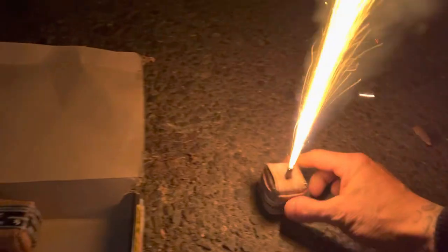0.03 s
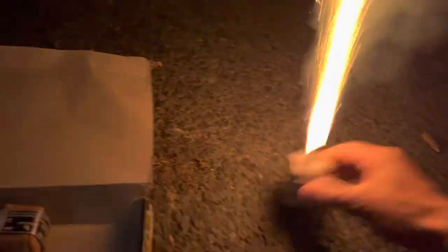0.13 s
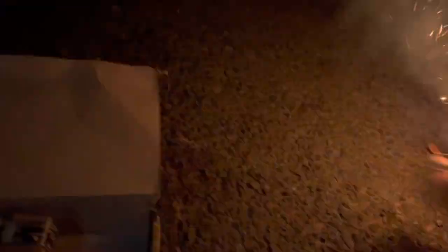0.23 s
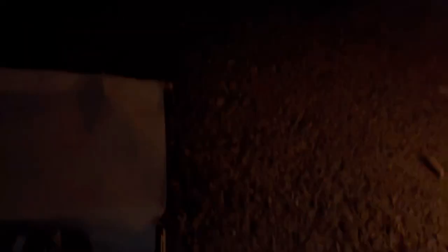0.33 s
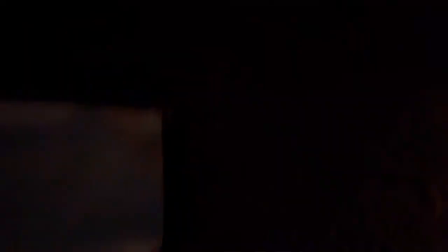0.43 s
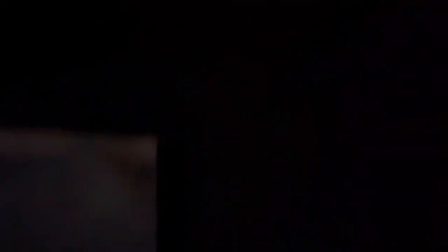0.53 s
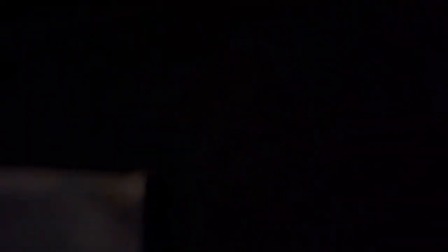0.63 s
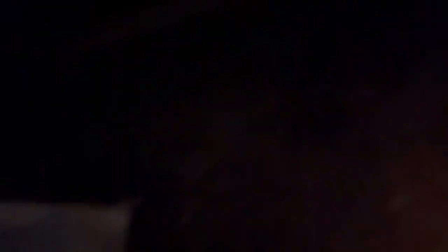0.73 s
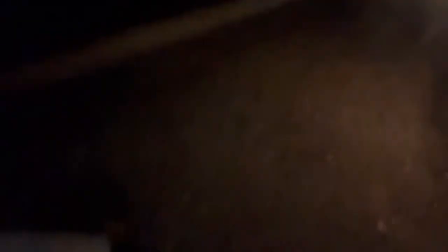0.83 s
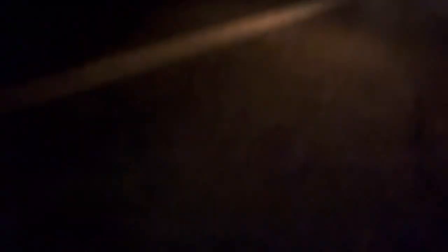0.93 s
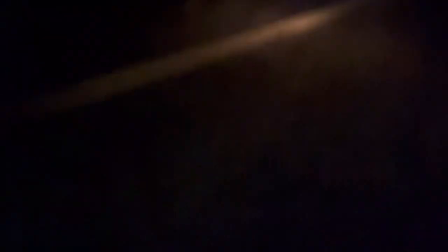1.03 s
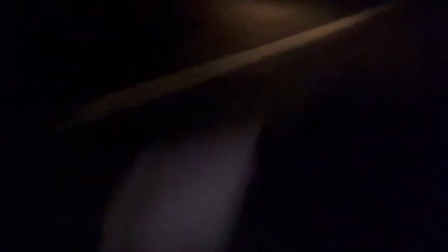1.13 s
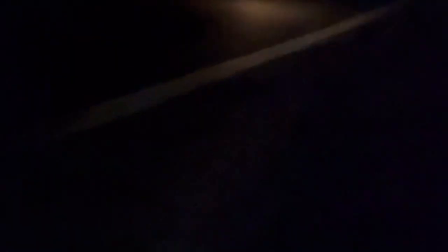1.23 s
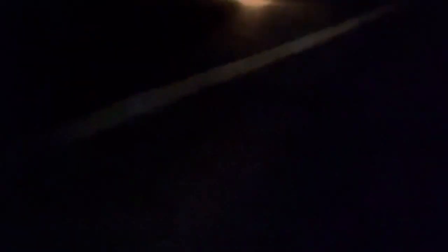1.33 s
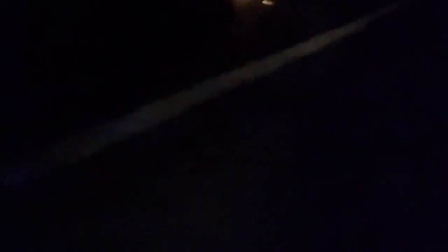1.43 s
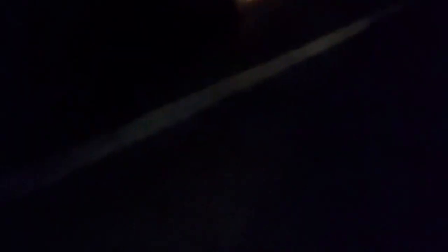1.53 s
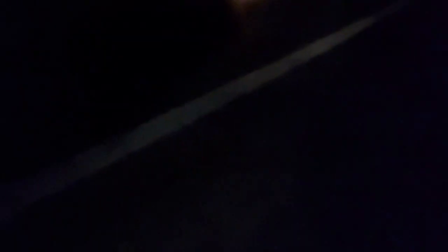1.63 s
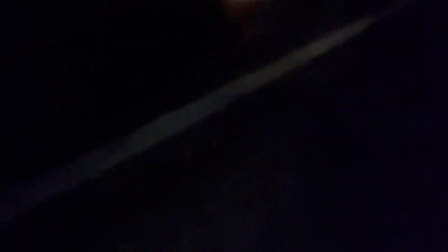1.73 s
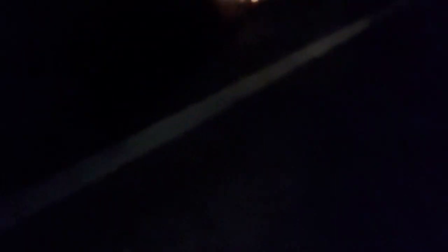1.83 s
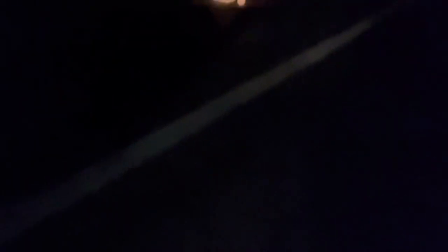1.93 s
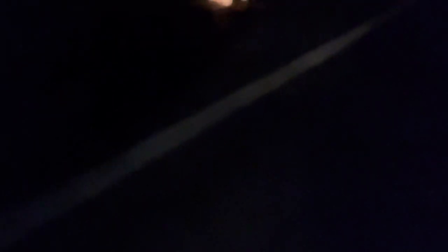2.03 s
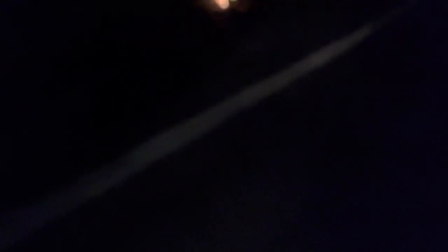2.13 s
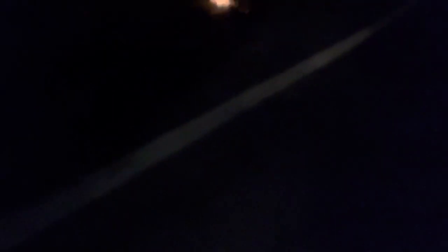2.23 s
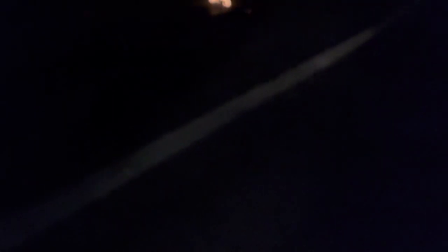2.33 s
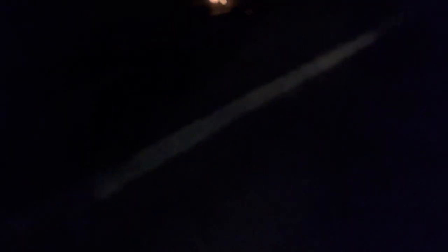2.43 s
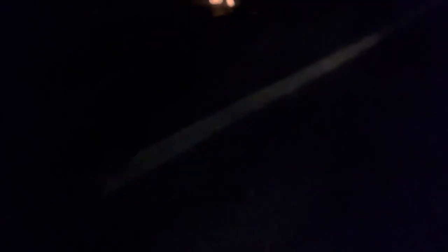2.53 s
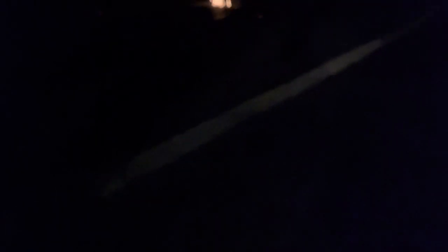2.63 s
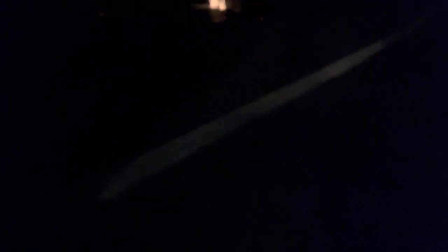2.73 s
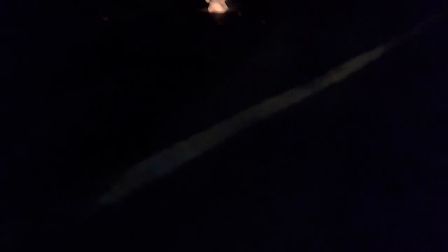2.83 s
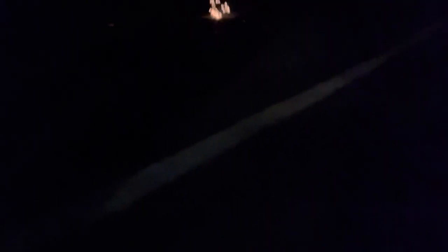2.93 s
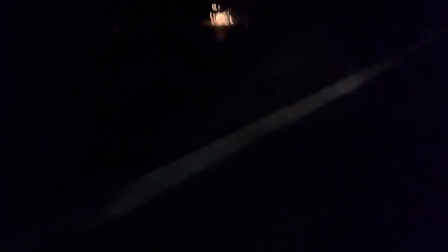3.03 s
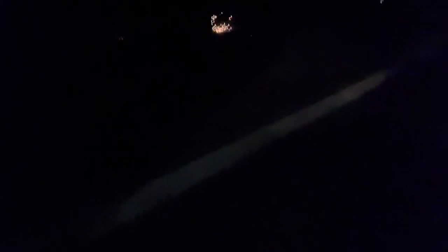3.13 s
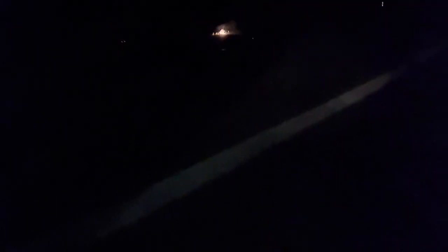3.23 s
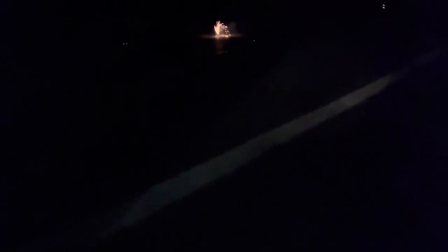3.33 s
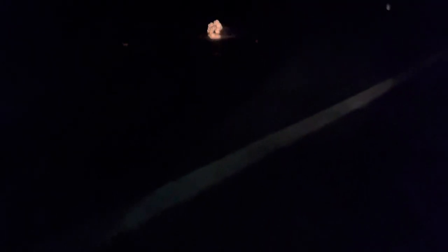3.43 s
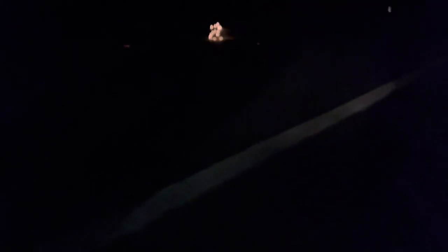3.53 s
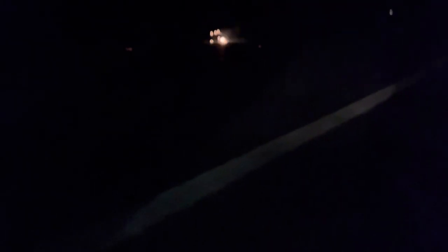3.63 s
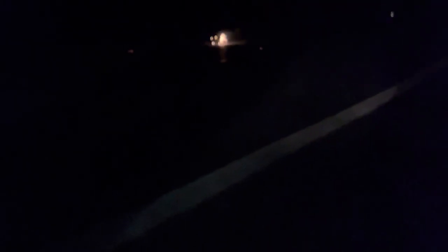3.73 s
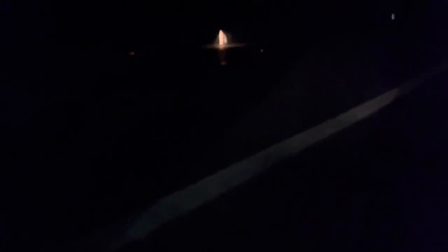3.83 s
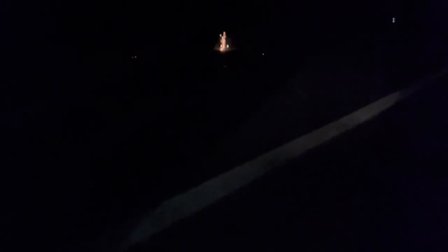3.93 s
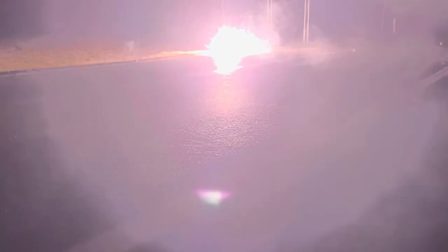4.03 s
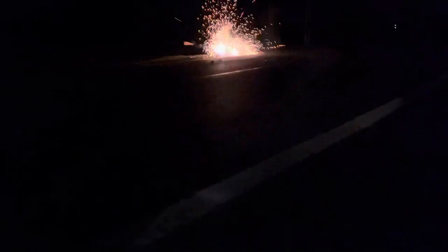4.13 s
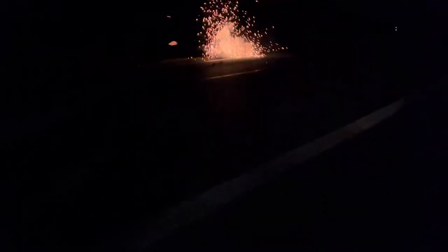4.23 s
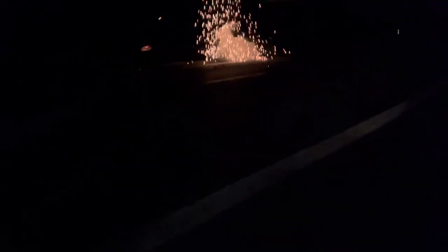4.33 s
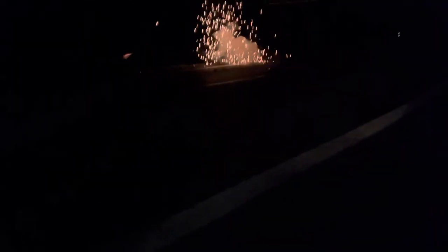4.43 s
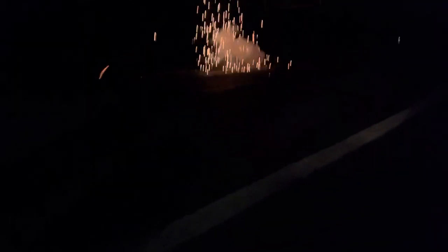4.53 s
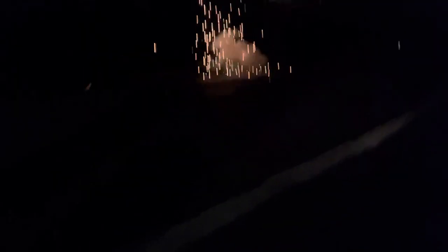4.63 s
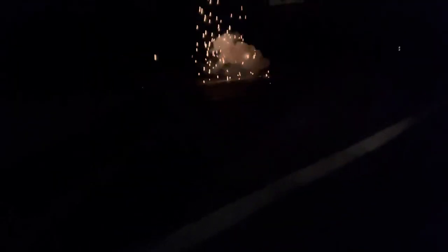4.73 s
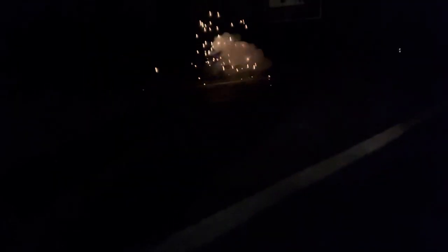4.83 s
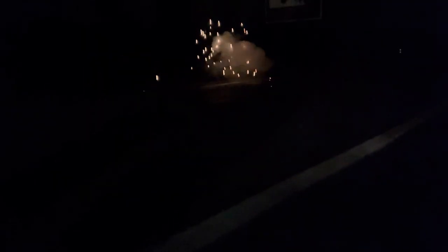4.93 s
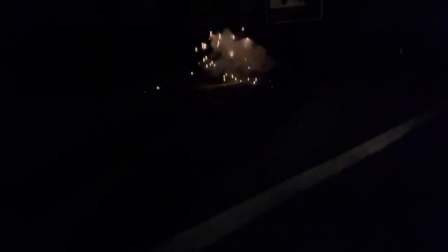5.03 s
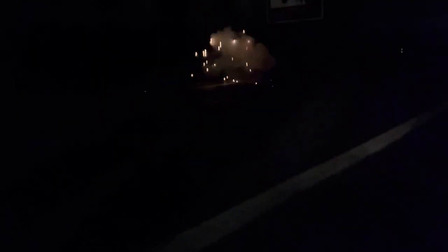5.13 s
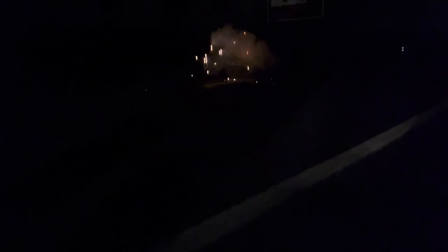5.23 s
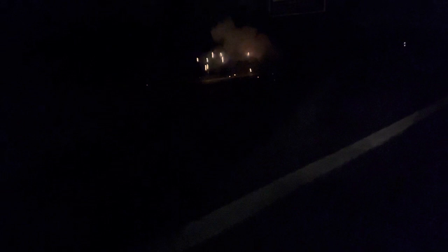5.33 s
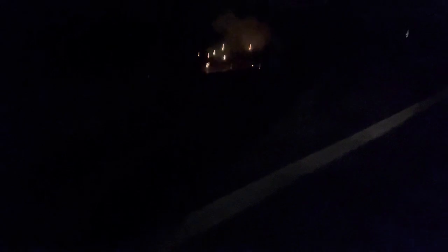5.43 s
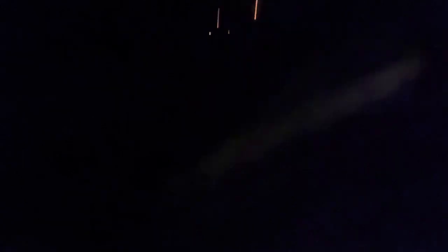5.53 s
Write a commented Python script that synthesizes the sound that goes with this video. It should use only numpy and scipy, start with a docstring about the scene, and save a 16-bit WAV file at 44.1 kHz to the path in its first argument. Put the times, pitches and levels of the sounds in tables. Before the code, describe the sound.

Fierce fizzing jet nearby, tossed onto asphalt with hard clacks, thin distant hiss, then a sharp clipped firecracker explosion with dull fading echoes.

```python
"""Firecracker on a night road

A firecracker with a burning fuse is lifted close by, thrown down the road and bounces to rest, hissing.
The jet, coloured noise, reaches the microphone directly and off asphalt and arm; each knock rings the case.
The bang, chirped pressure fronts, overloads the microphone and rolls back, ever duller, as fading noise from
far walls and trees, with thumps and a low boom. Embers tick, a sleeve swishes, far traffic lies beneath."""
import sys
import numpy as np
from scipy import signal
from scipy.fft import rfft, irfft, next_fast_len
from scipy.io import wavfile
from scipy.ndimage import uniform_filter1d, map_coordinates

SR = 44100
rng = np.random.default_rng(int(sys.argv[2]) if len(sys.argv) > 2 else 0)


def persist_wave(psi):
    """Save psi, clipped to +-1, as 16-bit WAV."""
    counts = np.round(np.clip(psi, -1, 1) * 32767).astype(np.int16)
    wavfile.write(sys.argv[1], SR, np.atleast_2d(counts).T)


N = 246959


def from_db(db):
    """Amplitude from decibels."""
    return 10 ** (np.asarray(db) / 20)


def rms_one(x):
    """Scales to an RMS of 1."""
    return x / np.sqrt(np.mean(x ** 2) + 1e-20)


def in_time(rows):
    """Straight lines between rows whose first column is t/s, one curve per further column."""
    s, *columns = np.transpose(rows)
    return [np.interp(np.arange(N) / SR, s, column) for column in columns]


def at_hz(points, hz):
    """Reads a table over f/Hz, with straight lines on a log scale of pitch."""
    points_hz, values = np.array(points)[:, 0], np.array(points)[:, 1]
    return np.interp(np.log(hz + 1), np.log(points_hz + 1), values)


def low_pass(order, hz):
    """Filter sections that keep what lies below a frequency."""
    return signal.butter(order, hz, fs=SR, output="sos")


def drift(rate_hz):
    """Random wander of spread 1, made at every 40th sample."""
    r = np.exp(-80 * np.pi * rate_hz / SR)
    slow = signal.lfilter([1], [1, -2 * r, r * r], rng.standard_normal(N // 40 + 2002))[2000:]
    return np.interp(np.arange(N) / 40, np.arange(len(slow)), rms_one(slow))


def panned(db):
    """Left and right gains for a level difference in dB, left minus right."""
    return from_db(np.array([db / 2, -db / 2]))


def swell(s, db, rise_db, fall_db):
    """A gain that climbs to its peak at time s and falls away, in dB per second."""
    t = np.arange(N) / SR - s
    return from_db(db - np.maximum(-t * rise_db, t * fall_db))


def add(out, s, sound):
    """Mixes a short sound in at time s."""
    i = round(s * SR)
    out[:, i:i + sound.shape[-1]] += sound[..., :N - i]


# phase between left and right: f/Hz, left lead/rad
LEFT_LEAD = [(300, 0), (1000, -1.5), (1400, -1), (2300, 0), (3000, -.8), (6800, -.4), (8100, .7), (9000, 3),
             (11000, 0), (12800, 0), (13300, 3), (16000, 3.3)]


def side_phase(hz):
    """Phase turn of left and right, half the lead each way."""
    return np.exp(.5j * np.outer([1, -1], at_hz(LEFT_LEAD, hz)))


# how alike left and right are in a wide noise: f/Hz, shared share of the power (0-1)
SIDE_LIKENESS = [(60, 0.78), (110, 0.98), (200, 0.88), (380, 0.79), (700, 0.76), (1290, 0.044),
                 (2380, 0.75), (4400, 0.96), (8120, 0.53), (15000, 0.59)]


def noise(spectrum, alike=1):
    """Coloured noise, left and right: a shared part, shifted in phase between them, plus a part of each."""
    size = next_fast_len(N)
    hz = np.arange(size // 2 + 1) * SR / size
    shared, *own = rfft(rng.standard_normal((3, size)))
    like = np.clip(alike * at_hz(SIDE_LIKENESS, hz), 0, 1)
    both = np.sqrt(like) * shared * side_phase(hz) + np.sqrt(1 - like) * np.array(own)
    return rms_one(irfft(both * from_db(at_hz(spectrum, hz)), size)[:, :N])


def chirped(gain, turns):
    """A pressure front whose lows lag by a set number of cycles, left and right; peak 1."""
    hz = np.arange(4097) * SR / 8192 + 1
    lag = np.exp(-2j * np.pi * turns * np.log(hz / 30))
    front = irfft(gain(hz) * lag * side_phase(hz), 8192)
    return front / np.max(np.abs(front))


# far traffic behind the road: f/Hz, relative level/dB per Hz
TRAFFIC_COLOUR = [(15, -45), (25, 0), (77, 10), (506, -13), (575, -12), (642, -11), (1550, -13), (1790, 1),
                  (2000, -28.5), (2600, -51), (4400, -120)]
TRAFFIC_DB = -51


def night():
    """Far traffic as a bed of low noise that wavers slightly."""
    return from_db(TRAFFIC_DB + 0.82 * drift(8.0)) * noise(TRAFFIC_COLOUR)


# cloth near the microphone: f/Hz, relative level/dB per Hz
CLOTH_COLOUR = [(710, -2.5), (1200, 3.5), (2510, -4.5), (2920, -2.5), (8250, -6.5), (9190, -11),
                (9600, -86), (10000, -33), (10700, -7), (13400, -6), (14500, -24), (15000, 0), (16000, -27)]
SWISH_S, SWISH_HOLD_S = 5.44, 0.088
SWISH_DB, SWISH_RISE_DB_PER_S, SWISH_FALL_DB_PER_S = -37, 216, 96


def sleeve():
    """Cloth brushing near the microphone: noise that swells, holds and fades."""
    t = np.arange(N) / SR - SWISH_S
    rise_db = SWISH_RISE_DB_PER_S * np.minimum(t, 0)
    fall_db = SWISH_FALL_DB_PER_S * np.maximum(t - SWISH_HOLD_S, 0)
    return from_db(SWISH_DB + rise_db - fall_db + 1.0 * drift(60)) * noise(CLOTH_COLOUR)


# falling embers: t/s, peak level/dB, left minus right/dB
EMBER_TICKS = [(5.095, -22, 6), (5.1277, -51, 10), (5.138, -46, -9), (5.22, -52, 8), (5.254, -53, 12)]


def embers():
    """Falling embers tick: tiny bursts of bright noise that die within 11 ms."""
    out, t = np.zeros((2, N)), np.arange(600) / SR
    bright = signal.butter(2, 4500, "high", fs=SR, output="sos")
    grits = rng.standard_normal((len(EMBER_TICKS), len(t)))
    for (s, db, pan), grit in zip(EMBER_TICKS, grits):
        tick = signal.sosfilt(bright, grit * from_db(-60 * t / 0.011))
        add(out, s, from_db(db) * tick / np.max(np.abs(tick)) * panned(pan)[:, None])
    return out


# swells of the low boom: t/s, level before its waver/dB, rise/dB per s, fall/dB per s
BOOM_SWELLS = [(4.12, -33, 600, 12), (4.25, -31, 54.5, 120), (4.435, -25, 406, 85)]
BOOM_HZ, SAG_HZ_PER_S, BOOM_END_S = 50, 11, 4.62


def boom():
    """A low hum after the bang, in three swells, that sags in pitch."""
    now = np.arange(N) / SR
    first, *later = BOOM_SWELLS
    hz = BOOM_HZ - SAG_HZ_PER_S * np.clip(now - first[0], 0, 1)
    level = sum(swell(*row) for row in later) + swell(*first) * (now < later[0][0])
    level = uniform_filter1d(level * (now < BOOM_END_S), size=1200) * from_db(2.0 * drift(15))
    phase = 2 * np.pi * np.cumsum(hz) / SR + [[.2], [-.2]]   # it comes from one side
    return np.sqrt(2) * level * np.sin(phase) * panned(1.1)[:, None]


# dull thumps: t/s, peak level before the waver/dB, top f/Hz, lag/cycles
THUMP_FRONTS = [(1.307, -31, 350, 0.47), (1.503, -28, 900, 0.89), (3.886, -26.5, 405, 1.3),
                (3.876, -37, 149, 5.6), (3.95, -26.5, 377, 0.7), (3.971, -22, 450, 0.48),
                (3.983, -22, 350, 0.46), (4.003, -26, 436, 0.73), (4.067, -14.5, 500, 0.97),
                (4.092, -8.5, 123, 0.63), (4.186, -25, 300, 0.76), (4.197, -14.5, 520, 1.2),
                (4.216, -13.5, 330, 0.69), (4.379, -38, 500, 1)]


def thumps():
    """Soft low fronts that fall in pitch and waver in strength."""
    out = np.zeros((2, N))
    for s, db, top_hz, turns in THUMP_FRONTS:
        def gain(hz):
            return (hz / 70) ** 2 / (1 + (hz / 70) ** 2.34) / (1 + (hz / top_hz) ** 4)
        add(out, s, from_db(db) * chirped(gain, turns))
    return out * from_db([2.5 * drift(90), 2.5 * drift(95)])


# echoes off far walls and trees, before waver and air loss:
# t/s, body level/dB, rumble level/dB, treble level/dB, rise/dB per s, fall/dB per s
FAR_ECHOES = [(4.028, -7.5, -36, -13, 2002.5, 1000), (4.115, -24.5, -29.5, -28, 14, 198),
              (4.217, -29.5, -49, -35, 311, 86), (4.389, -22, -33.5, -30.5, 85, 50.5),
              (4.729, -31.5, -52, -47, 266, 205), (4.8, -48, -44.5, -48.5, 41.5, 56),
              (5.02, -34.5, -60, -73, 49, 29)]
# echoes that come back narrowed to the middle range: t/s, level before waver/dB, rise/dB per s, fall/dB per s
MIDDLE_ECHOES = [(4.35, -39, 300, 210), (4.39, -33, 306, 250), (4.46, -33, 300, 105),
                 (4.725, -26, 550, 303), (4.744, -34, 900, 599), (4.83, -40, 200, 200)]
# colours of the echoes: f/Hz, relative level/dB per Hz; the bang borrows body and treble
BODY_COLOUR = [(71, -48), (120, -13.5), (398, -6), (499, -4.5), (773, -2), (1120, -5.5), (1570, -15),
               (2490, -19), (3500, -27), (4550, -38.5), (7700, -120)]
RUMBLE_COLOUR = [(15, -47), (25, -21), (48, -4), (87, -5.5), (134, 0.5), (250, -18.5), (320, -34),
                 (550, -120)]
TREBLE_COLOUR = [(1180, -26), (2000, 4), (2570, 0.5), (8250, -3), (9170, -14.5), (9780, -90.5),
                 (10300, -12), (12100, -1.5), (13300, -10), (14000, -36)]
MIDDLE_COLOUR = [(450, -29), (700, 9), (900, 11), (1200, 5.5), (1600, -53)]
ROLL_S = 4.03   # the echo sets in
AIR_DB_PER_S = 19.5   # multiplied by (f / 5 kHz) squared less a half


def roll():
    """Scattered echoes of the bang; air eats the treble the farther it travels."""
    body, rumble, sheen = [sum(swell(row[0], row[k], *row[4:]) for row in FAR_ECHOES) for k in range(1, 4)]
    since = np.maximum(np.arange(N) / SR - ROLL_S, 0)
    rest, treble = noise(TREBLE_COLOUR, alike=0.29), 0
    for edge_hz in (11100, 7660, 5900, 4600, 3400):   # peel off bands from the top
        below = signal.sosfiltfilt(low_pass(3, edge_hz), rest)
        air_db = -AIR_DB_PER_S * ((edge_hz / 5000) ** 2 - 0.5) * since
        treble = treble + from_db(air_db) * (rest - below)
        rest = below
    lumps = from_db(1.06 * drift(66) + 1.0 * drift(8.7))
    echo = body * lumps * noise(BODY_COLOUR, alike=0.51) + rumble * noise(RUMBLE_COLOUR)
    middle = sum(swell(*row) for row in MIDDLE_ECHOES)
    echo += middle * from_db(1.9 * drift(40)) * noise(MIDDLE_COLOUR, alike=0.83)
    echo += sheen * lumps * (treble + rest)
    return echo * np.clip(since / 0.0028, 0, 1)


# knocks on the asphalt: t/s, peak level before panning/dB, left minus right/dB, brightness/dB per octave
KNOCKS = [(1.3384, -6.5, -3, -0.2), (1.3475, -16, 5, 11), (1.87, -4, -4, 1), (2.328, -9.5, -4, -1.4),
          (2.533, -30, -4, 5), (2.593, -17, -3, 0), (2.731, -21.5, 5, 3), (2.885, -24.5, -5, 0.5)]
# modes of the cardboard case: f/Hz, relative level before brightness and chance/dB, t60/s
CASE_MODES = [(375, -15.5, 0.0096), (710, 11.5, 0.0045), (1238, 11.5, 0.0056), (2040, 3, 0.0062),
              (4760, -3.5, 0.0078), (6420, 5.5, 0.0059), (7730, 18, 0.0035), (12400, -14, 0.005)]
# grit crushed under each knock, its level relative to the modes before brightness
GRIT_DB, GRIT_T60_S, GRIT_TOP_HZ = 16.5, 0.0047, 6900


def knocks():
    """Each bounce presses within 2.4 ms, sets the short modes of the case ringing and crushes grit."""
    out, t = np.zeros((2, N)), np.arange(1500) / SR
    press = np.clip((t - .0008) / .0016, 0, 1) ** 3
    lucks_db = rng.normal(0, 0.39, (len(KNOCKS), len(CASE_MODES)))
    for (s, db, pan, tilt), luck_db in zip(KNOCKS, lucks_db):
        ring = 0
        for (hz, level_db, t60), chance_db in zip(CASE_MODES, luck_db):
            mode_db = level_db + tilt * np.log2(hz / 2000) + chance_db - 60 * t / t60
            ring = ring + from_db(mode_db) * np.sin(2 * np.pi * hz * t)
        grit = signal.sosfilt(low_pass(2, GRIT_TOP_HZ), rng.standard_normal(len(t)))
        knock = press * (ring + from_db(GRIT_DB + 1.9 * tilt - 60 * t / GRIT_T60_S) * grit)
        add(out, s, from_db(db) * knock / np.max(np.abs(knock)) * panned(pan)[:, None])
    return out


# turns of the tumbling case: first swing t/s, last swing t/s, time per turn/s, boost/dB, delay of the sizzle/s
TUMBLE_TURNS = [(1.375, 1.48, .047, 3, .005), (1.516, 1.81, .047, 7, .024), (1.9, 2.28, .0525, 7.5, .025),
                (2.4, 2.58, .08, 5, 0), (2.657, 3.0, .162, 7, .008)]


def swings(t, width_s, delayed):
    """Boost in dB, before each band's share, as the jet sweeps past the microphone once a turn."""
    boost_db = 0
    for first, last, turn, db, lag in TUMBLE_TURNS:
        for s in np.arange(first, last, turn):
            boost_db = boost_db + db * np.exp(-.5 * ((t - s - delayed * lag) / width_s) ** 2)
    return boost_db


# colours of the jet: f/Hz, relative level/dB per Hz
HISS_COLOUR = [(650, -28.5), (1100, -9.5), (1260, -4.5), (1560, -6), (1980, -3), (2700, -0.5), (5000, -8.5),
               (6500, -23.5), (11000, -120)]
ROAR_COLOUR = [(240, -29.5), (400, -13.5), (583, -1), (676, -4.5), (964, 1), (1500, -5.5), (1950, -20.5),
               (3300, -120)]   # low part of the flame
SIZZLE_COLOUR = [(2650, -10), (4500, -3), (5080, -2.5), (5900, 0), (8110, 1), (8670, -1.5), (9300, -60.5),
                 (12100, -62.5), (20500, -120)]
TOP_COLOUR = [(6000, -141), (10200, -10.5), (11000, 10), (12000, 8), (13300, 8), (14000, -11), (14400, -8),
              (15100, 12), (16000, -43)]   # thin top
FLAME_COLOUR = [(15, -62), (25, -30), (40, -28.5), (54, -5.5), (91, -15), (150, -6), (450, -0.5),
                (580, -16.5), (990, -120)]   # rumble of the flame
HOLLOW_COLOUR = [(3400, -16.5), (3800, -5.5), (4200, -5), (4480, -12.5), (4800, -9), (5500, -8.5),
                 (6100, -8), (6350, -23), (6700, -0.5), (7200, -24.5), (8000, -66)]   # fuse hole, heard once the case is far off
# Levels below come before sputter, falters, swings and the mix with the bounces.
# jet as it is lifted, thrown and comes to rest: t/s, hiss level/dB, treble over the hiss/dB
JET_LEVELS = [(0, -36, -4), (.07, -34.5, -3), (.2, -25.5, -9), (.3, -28, -6), (.43, -31.5, -4.5),
              (.55, -30, -14.5), (.64, -35, -6.5), (.675, -30.5, -13.5), (.715, -29.5, -5),
              (.73, -25, -4.5), (.76, -23.5, -4.5), (.82, -25.5, -6), (1.0, -29, -8.5), (1.22, -33, -7.5),
              (1.32, -34.5, -5), (1.44, -33.5, -8.5), (1.74, -43, 1.5), (1.86, -40.5, -4.5),
              (2.0, -45.5, 1.5), (2.16, -51, 8), (2.35, -41, -2), (3.0, -42.5, -0.5), (3.35, -43.5, 3.5),
              (3.66, -47, -2.5), (3.85, -43.5, 0), (4.0, -48, -1)]
# low part of the flame, loud only close by: t/s, roar level/dB, rumble level/dB
FLAME_LEVELS = [(0, -29.5, -29.5), (.08, -26, -28.5), (.2, -22, -30), (.43, -25.5, -38.5), (.6, -33, -43),
                (.76, -33, -40), (.9, -38, -49), (1.08, -40, -51.5), (1.25, -47.5, -52.5),
                (1.44, -40.5, -53), (1.65, -55, -60.5), (2.2, -58.5, -61), (3.9, -56, -63.5),
                (4.0, -46, -35.5)]
# thin top: t/s, level over the sizzle/dB
TOP_LEVELS = [(0, 4.5), (.5, -2.5), (1.1, -7.5), (1.7, -2.5), (2.25, -3), (2.45, -10.5), (4.0, -9)]
# fuse hole: t/s, level over the hiss/dB
HOLLOW_LEVELS = [(1.0, -27), (1.4, 1), (1.7, 0.5), (2.4, -3), (4.0, 0)]
# the fuse falters: t/s, length/s, depth/dB, depth in the treble/dB
FUSE_FALTERS = [(3.144, 0.018, 10, 4), (3.461, 0.066, 9.5, 7)]
DROP_S, RECOVER_S = 0.042, 0.035
# the jet spits: t/s, boost in hiss and sizzle/dB
JET_SPITS = [(.195, 3), (.732, 3), (.765, 3), (.915, 5), (.953, 5), (1.0, 4), (1.1, 3)]
SPIT_S = 0.0011   # half width
# bounce off the asphalt while lifted and thrown: t/s, extra path/ms, strength (0-1)
ROAD_BOUNCE = [(0, .4, .3), (.13, .38, .55), (.19, .57, .5), (.24, .57, .8), (.28, .54, .8),
               (.32, .44, .85), (.36, .38, .85), (.41, .32, .8), (.44, .31, .5), (.52, .31, .45),
               (.56, .31, .55), (.64, .31, .55), (.68, .38, .5), (.72, .68, .5), (.76, 1.0, .6),
               (.8, 1.0, .6), (.85, .965, .6), (.92, .87, .8), (.96, .81, .85), (1.0, .74, .75),
               (1.04, .64, .7), (1.08, .585, .7), (1.12, .49, .5), (1.16, .41, .6), (1.2, .31, .7),
               (1.24, .255, .7), (1.27, .16, .65), (1.31, .09, .6), (1.339, .03, .6)]
# hops along the road: take-off t/s, landing t/s, extra path at the top/ms
ROAD_HOPS = [(1.339, 1.87, .085), (1.87, 2.329, .1)]
# bounce off the arm that swings the case away: t/s, extra path/ms, strength (0-1)
ARM_BOUNCE = [(.41, .28, 0), (.44, .24, .6), (.48, .175, .7), (.55, .135, .65), (.61, .125, .5),
              (.655, .11, 0)]
ASPHALT_HZ = 5500   # the rough road scatters what lies above
LYING_MS, LYING_STRENGTH = 0.24, 0.4   # a second, steady bounce while the case is down on the road
TOP_FLARE_S, SIZZLE_FLARE_S = .008, .012   # half width of a swing
SIZZLE_SWING, SIZZLE_REST_DB = 1.25, -3   # share of the swing, level between swings after landing
TIP_SWING = .035   # share by which a hop's extra path shortens per dB of swing
NEAR_PAN_DB, FAR_PAN_DB, FLIGHT_S = -2.5, -1, (0.9, 1.2)   # left minus right, before and after the flight


def burning_jet(t, flare_db, late_flare_db):
    """Turbulent gas from the fuse as six bands of noise that sputter, spit and falter."""
    (hiss_db, treble_db), (roar_db, rumble_db) = in_time(JET_LEVELS), in_time(FLAME_LEVELS)
    falter_db = 0
    for s, length, *depths_db in FUSE_FALTERS:
        dip = np.interp(t - s, [-DROP_S, 0, length, length + RECOVER_S], [0, 1, 1, 0])
        falter_db = falter_db + np.outer(depths_db, dip)
    sizzle_db = hiss_db + treble_db - falter_db[1]
    hiss_db = hiss_db - falter_db[0]
    top_db = sizzle_db + in_time(TOP_LEVELS)[0]
    sizzle_db = sizzle_db + SIZZLE_REST_DB * (t > ROAD_HOPS[0][0]) + SIZZLE_SWING * late_flare_db
    spit_db = sum(db * np.exp(-.5 * ((t - s) / SPIT_S) ** 2) for s, db in JET_SPITS)
    sputter_db = spit_db + 0.85 * drift(21) + 1.0 * drift(100)
    jet = from_db(hiss_db + 0.07 * late_flare_db + sputter_db + 1.5 * drift(35)) * noise(HISS_COLOUR)
    jet += from_db(roar_db + 0.22 * sputter_db) * noise(ROAR_COLOUR)
    jet += from_db(sizzle_db + sputter_db) * noise(SIZZLE_COLOUR)
    jet += from_db(top_db + 0.85 * flare_db + 0.43 * sputter_db + 1.3 * drift(30)) * noise(TOP_COLOUR)
    jet += from_db(rumble_db + .5 * sputter_db) * noise(FLAME_COLOUR)
    jet += from_db(hiss_db + in_time(HOLLOW_LEVELS)[0] + sputter_db) * noise(HOLLOW_COLOUR)
    return jet


def fuse():
    """The jet heard directly and off road and arm, where the delays cut notches that move with the path."""
    samples = np.arange(N)
    t = samples / SR
    flare_db = swings(t, TOP_FLARE_S, False)
    jet = burning_jet(t, flare_db, swings(t, SIZZLE_FLARE_S, True))
    path_ms, strength = in_time(ROAD_BOUNCE)
    arcs = np.array([np.clip(4 * (t - up) * (down - t) / (down - up) ** 2, 0, 1) for up, down, _ in ROAD_HOPS])
    path_ms = path_ms + np.transpose(ROAD_HOPS)[2] @ arcs * (1 - TIP_SWING * flare_db)
    path_ms = path_ms * (1 + .018 * drift(30))   # the flame tip wavers
    strength = strength * (t < ROAD_HOPS[-1][1])
    lying = LYING_STRENGTH * (1 - arcs.sum(axis=0)) ** 2 * np.interp(t, FLIGHT_S, [0, 1])
    late = samples - np.outer([.99, 1.01], path_ms) / 1000 * SR   # slightly different paths left and right
    dulled = signal.sosfiltfilt(low_pass(2, ASPHALT_HZ), jet)
    off_road = np.array([map_coordinates(side, [when], order=3) for side, when in zip(dulled, late)])
    arm_ms, arm = in_time(ARM_BOUNCE)
    arm_late = samples - arm_ms / 1000 * SR
    off_arm = np.array([map_coordinates(side, [arm_late], order=3) for side in dulled])
    off_road_lying = np.roll(dulled, round(LYING_MS / 1000 * SR), axis=1)
    heard = jet + arm * off_arm + strength * off_road * [[.88], [1.1]] + lying * off_road_lying
    heard = heard / np.sqrt(1 + strength ** 2 + lying ** 2 + arm ** 2)
    pan_db = np.interp(t, FLIGHT_S, [NEAR_PAN_DB, FAR_PAN_DB])
    return heard * panned(pan_db) * (t < TONE_SWELL[0])   # the jet ends as the bang's tone peaks


# fronts, direct and off the nearest surfaces, before the microphone overloads:
# t/s, peak level/dB, lag/cycles, bottom f/Hz, top f/Hz, crackle level/dB
BLAST_FRONTS = [(4.0207, 1.5, 1.3, 170, 2200, -22), (4.0282, 3, 1.25, 25, 9000, -4)]
# colour of the fronts: f/Hz, relative level/dB per Hz
BLAST_COLOUR = [(20, -31), (45, 8), (90, 4), (160, 0.5), (280, 2.5), (500, -3), (1000, -13), (2000, -17),
                (4000, -70), (9000, -66), (16000, -56)]
CRACKLE_T60_S = .008
# rough tone around the first front: t/s, level/dB, rise/dB per s, fall/dB per s
TONE_SWELL = (4.0186, 3, 4200, 1800)
TONE_HZ, GRAIN_DB, ROUGH_DB = 980, -18, -10   # grain and roughness relative to the tone


def bang():
    """Blast fronts trailed by a few ms of crackle; a rough 1 kHz tone swells just before and into the first."""
    out, t = np.zeros((2, N)), np.arange(2000) / SR
    for s, db, turns, bottom_hz, top_hz, crackle_db in BLAST_FRONTS:
        def gain(hz):
            return from_db(at_hz(BLAST_COLOUR, hz)) / (1 + (hz / top_hz) ** 4) / (1 + (bottom_hz / hz) ** 4)
        add(out, s, from_db(db) * chirped(gain, turns))
        crackle = signal.lfilter([.6], [1, -.3], rng.standard_normal((2, len(t))))
        add(out, s, from_db(crackle_db - 60 * t / CRACKLE_T60_S) * crackle)
    since = np.arange(N) / SR - TONE_SWELL[0]
    tone = np.cos(2 * np.pi * TONE_HZ * since + np.angle(side_phase(np.array([TONE_HZ]))))
    rough = from_db(ROUGH_DB) * noise(BODY_COLOUR)
    grain = from_db(GRAIN_DB) * noise(TREBLE_COLOUR)
    return out + swell(*TONE_SWELL) * (tone + rough + grain)


def scene():
    """Everything that reaches the microphone by the road."""
    far = night()
    return far + fuse() + knocks() + bang() + boom() + thumps() + roll() + embers() + sleeve()


def record(dry):
    """The overloaded microphone clips flat, then the top is cut at 16.6 kHz."""
    top_cut = signal.cheby2(16, 70, 16600, fs=SR, output="sos")
    return signal.sosfilt(top_cut, np.clip(dry, -.98, .98))


dry = scene()
out = record(dry)
persist_wave(out)
```